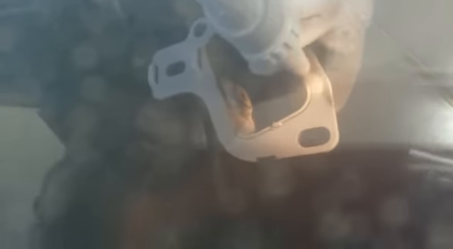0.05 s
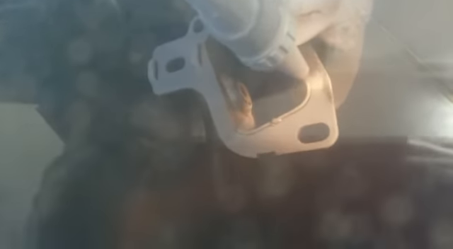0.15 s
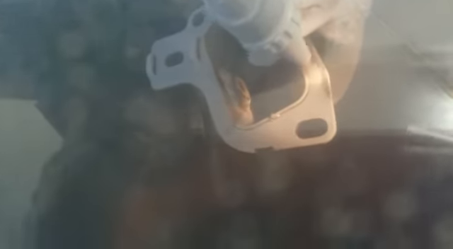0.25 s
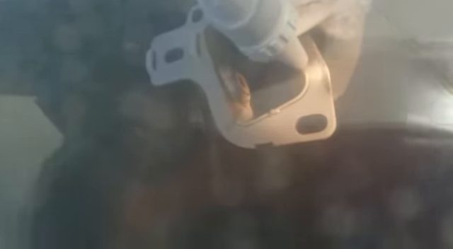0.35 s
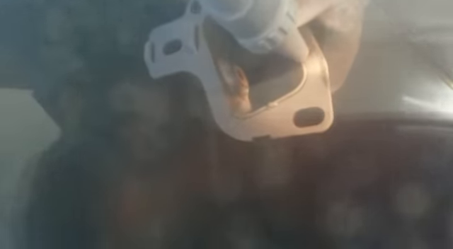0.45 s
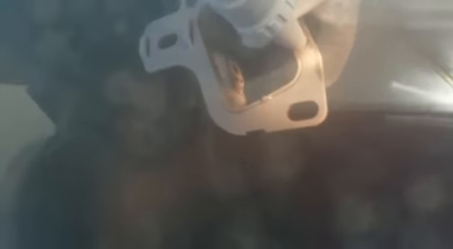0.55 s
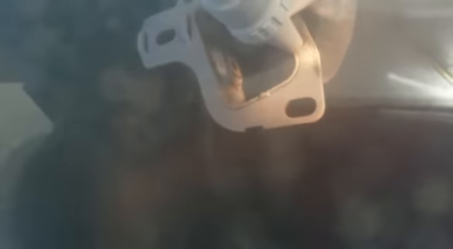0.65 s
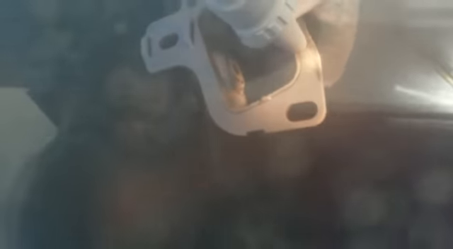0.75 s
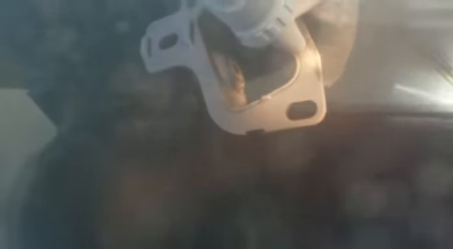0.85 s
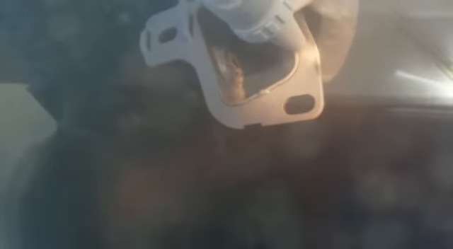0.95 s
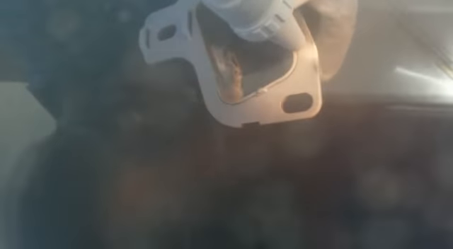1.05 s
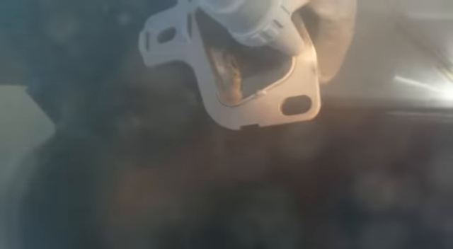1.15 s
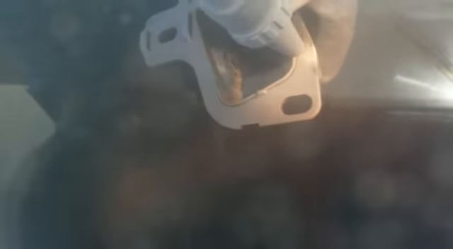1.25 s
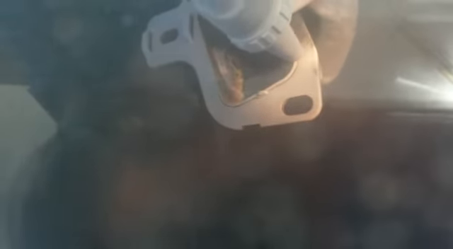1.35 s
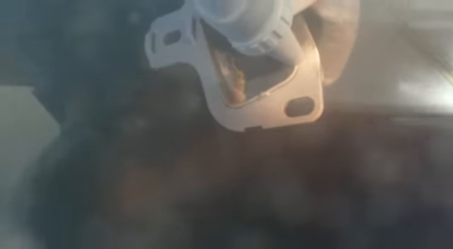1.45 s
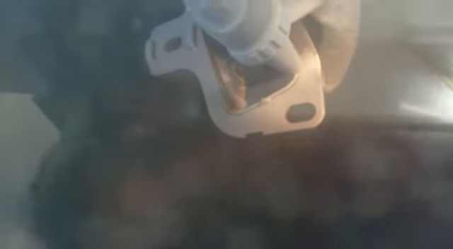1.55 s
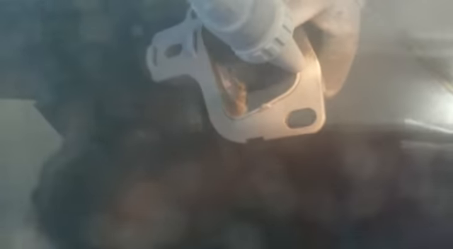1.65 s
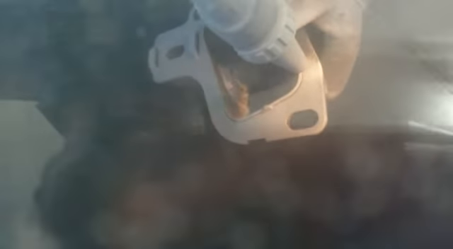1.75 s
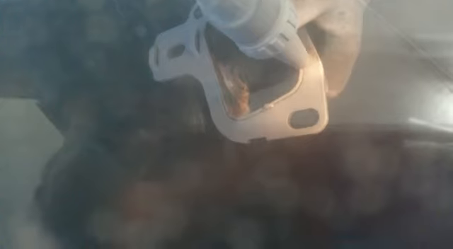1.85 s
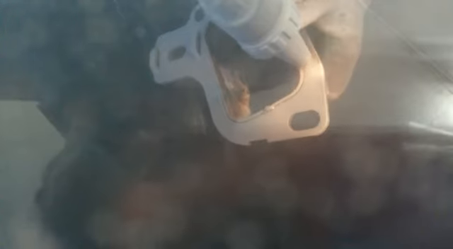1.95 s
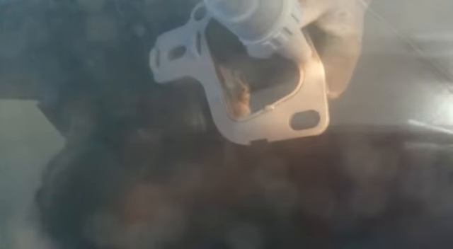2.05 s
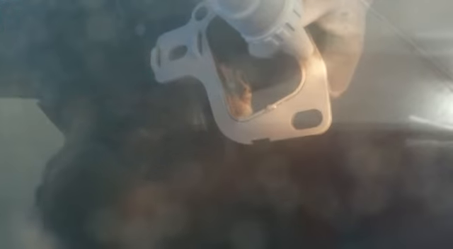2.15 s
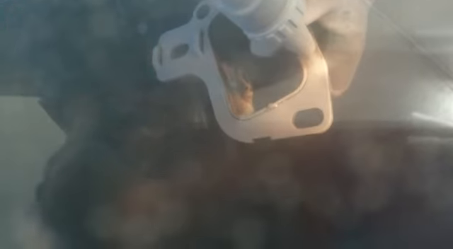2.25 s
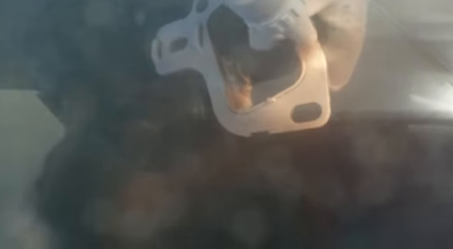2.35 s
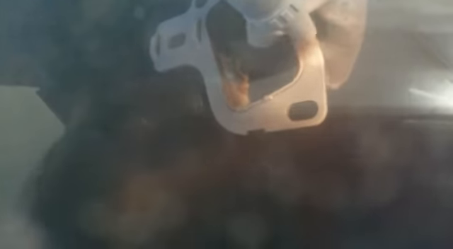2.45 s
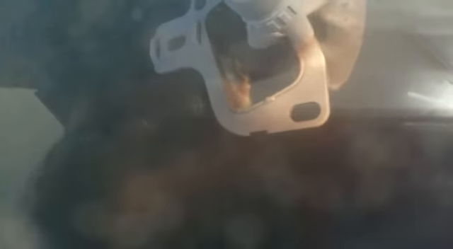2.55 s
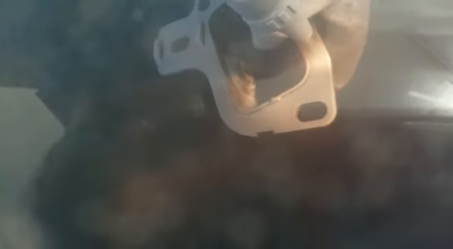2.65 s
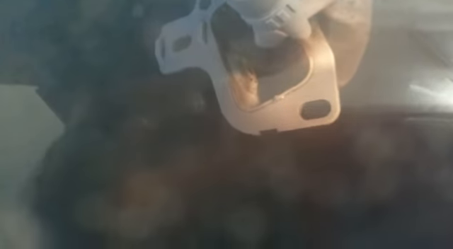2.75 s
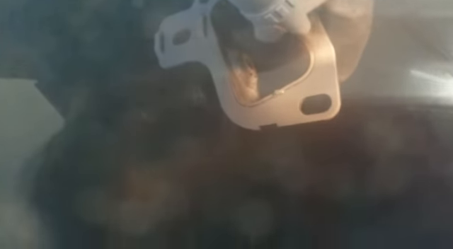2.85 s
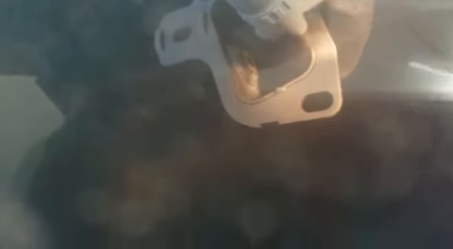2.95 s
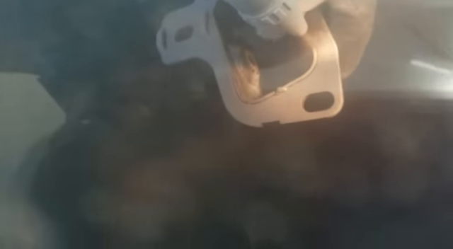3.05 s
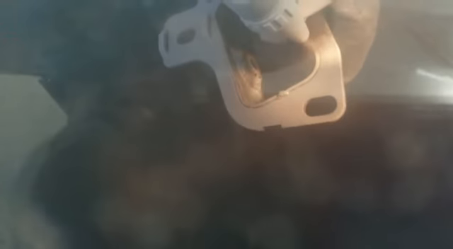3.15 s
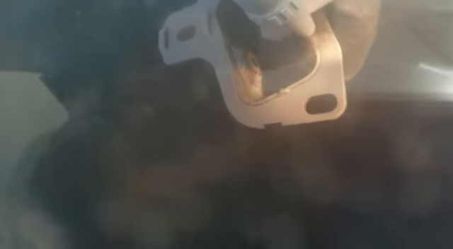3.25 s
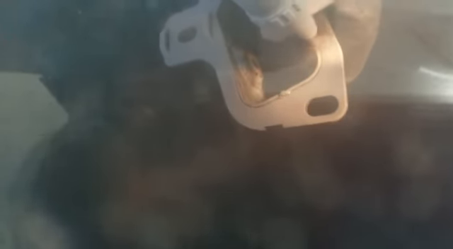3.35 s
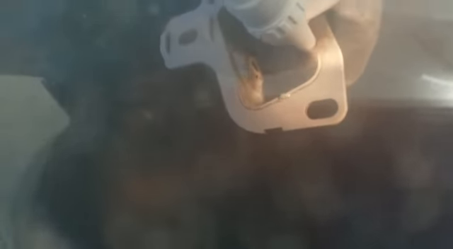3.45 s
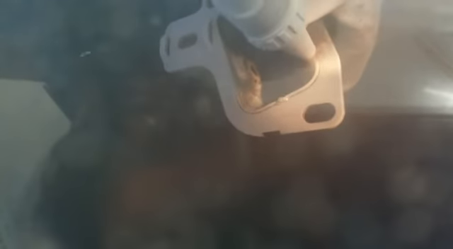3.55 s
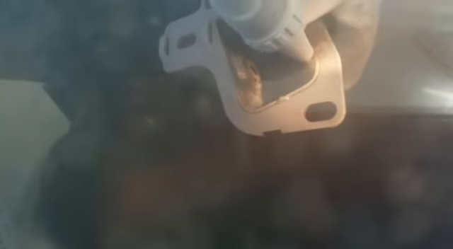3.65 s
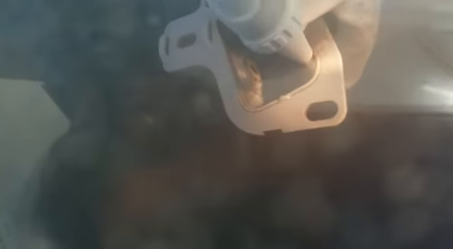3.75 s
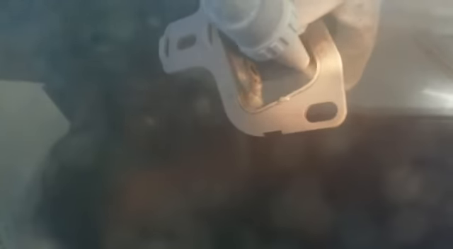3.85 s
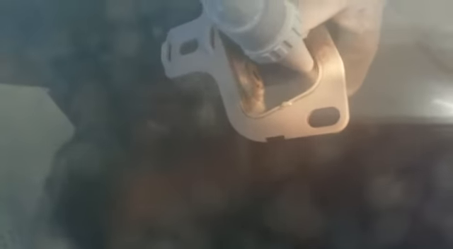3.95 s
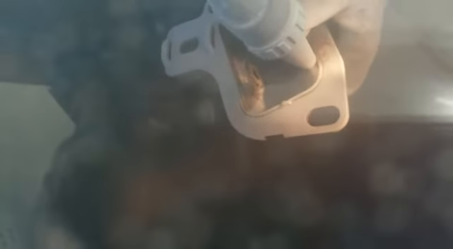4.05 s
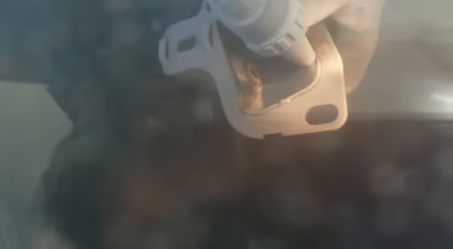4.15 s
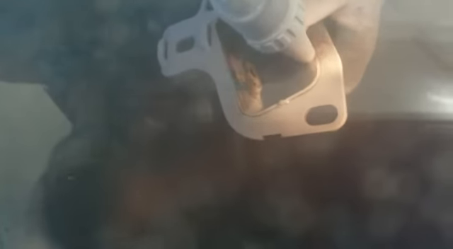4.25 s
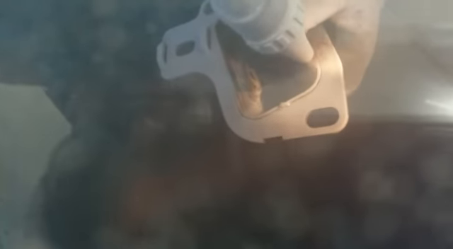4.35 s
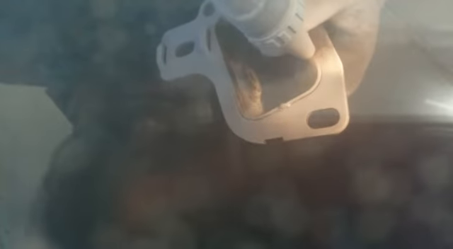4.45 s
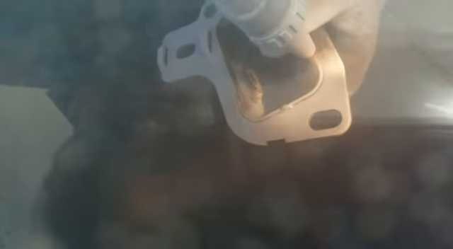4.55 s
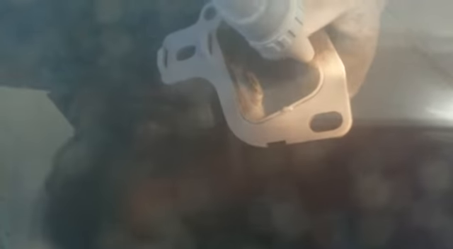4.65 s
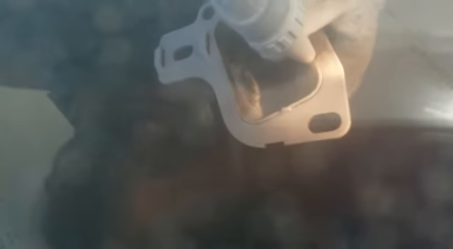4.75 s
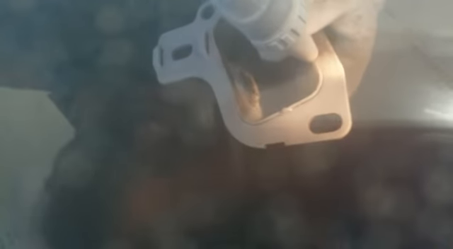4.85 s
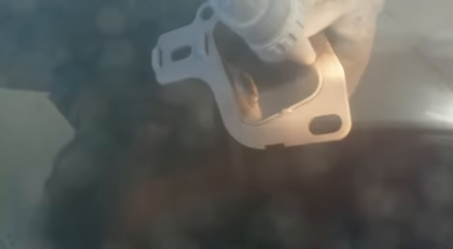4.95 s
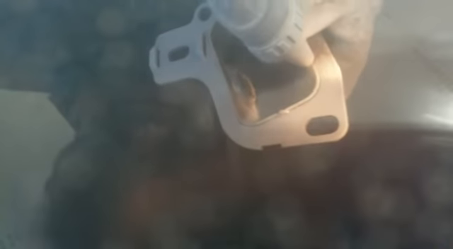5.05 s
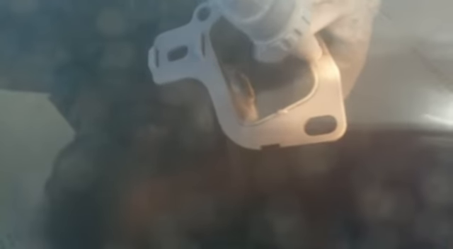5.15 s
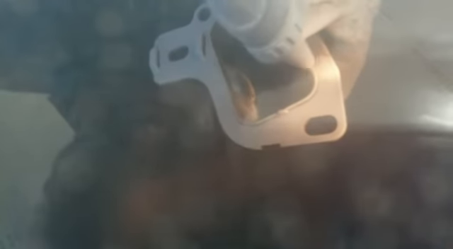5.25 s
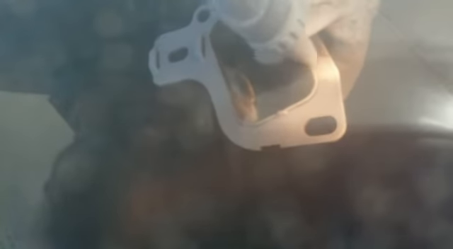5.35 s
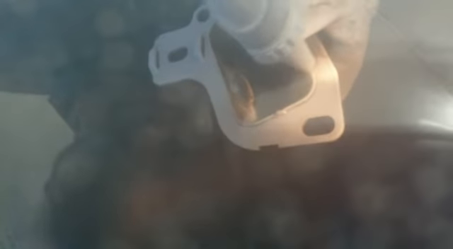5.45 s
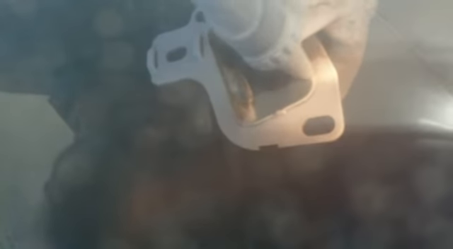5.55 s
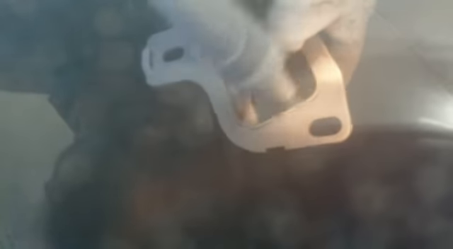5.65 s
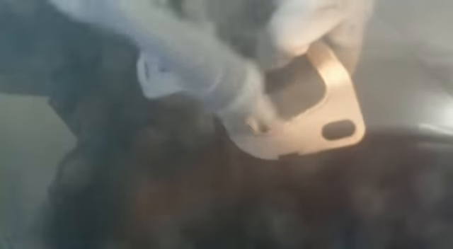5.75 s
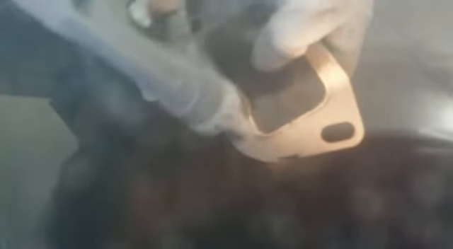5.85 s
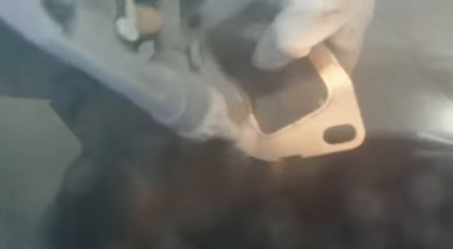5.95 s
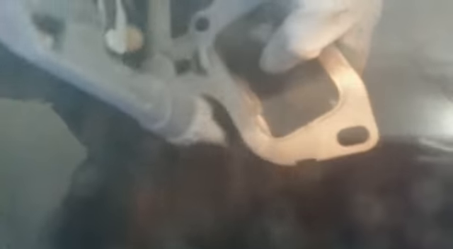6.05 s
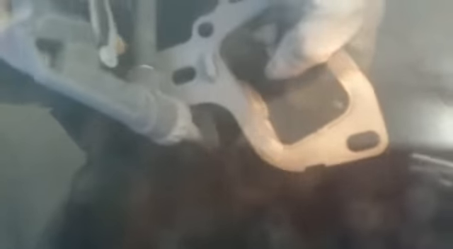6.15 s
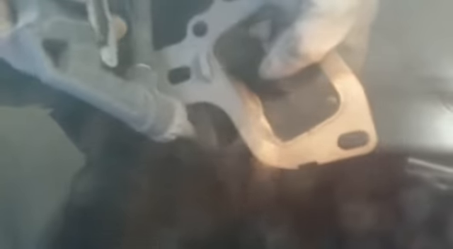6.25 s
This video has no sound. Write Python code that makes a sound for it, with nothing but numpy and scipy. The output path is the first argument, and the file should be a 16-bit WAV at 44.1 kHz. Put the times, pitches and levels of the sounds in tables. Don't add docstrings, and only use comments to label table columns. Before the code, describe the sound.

From 0 to 5.8 s a loud, harsh abrasive blast hisses continuously in a small sheet-metal cabinet: dense, treble-heavy turbulence with clumpy grit and metallic ringing around 4 to 5 kHz, plus a brighter sizzle near 11 kHz on the right. Its level wavers by a few decibels; around 1.3 to 1.9 s the high ring swells, and from 2.7 s a thin singing edge near 4.4 kHz appears, strongest at 3 s, then fades by 5.7 s. Low workshop hum and a compressor throbbing about 17 times a second lie mostly masked behind. At 5.8 s the jet stops abruptly with a very short box tail, and the background swells. Soft knocks come at 5.95 and 6.05 to 6.11 s, with a faint high valve whistle between. At 6.26 s grit hits again in a sharp, ringing metallic burst, ending at about 6.3 s. Close stereo phone pickup, compressed and grainy.

```python
import sys
import numpy as np
from scipy import signal
from scipy.fft import rfft, irfft
from scipy.io import wavfile
from scipy.ndimage import uniform_filter1d

SR = 44100
rng = np.random.default_rng(int(sys.argv[2]) if len(sys.argv) > 2 else 0)


def store_pcm(level_fs):
    pcm = np.round(np.clip(level_fs, -1, 1) * 32767).astype(np.int16)
    wavfile.write(sys.argv[1], SR, np.atleast_2d(pcm).T)


def undo_db(level):
    steps = np.asarray(level, float) / 20
    return 10 ** steps


N = 277830
T = np.arange(N) / SR
F = np.fft.rfftfreq(N, 1 / SR)

# frequency in Hz, level in dB.
SHOP_COLOUR = [(30, -20), (95, 5), (230, 11.5), (420, -3.5), (600, 5), (900, 1.5), (1500, 3), (2100, -8.5),
               (4500, -17), (7000, -21.5), (14000, -29)]
# frequency in Hz, likeness from 0 to 1.
PORT_LIKENESS = [(60, 0.68), (700, 0.43), (1200, 0), (3000, 0.03), (15000, 0.1)]
# frequency in Hz, width in Hz, level in dB.
TANK_MODES = [(103.6, 24, -10.5), (155, 35, -30), (221.3, 14.5, 3), (252.9, 12, 1.5), (359.4, 67, -13.5),
              (557.2, 37, -8), (680, 39, -13), (877, 6.6, -0.66), (1060, 48, -9)]
STROKE_HZ = 16.87
# start in seconds, frequency in Hz, level in dB,
# T60 in seconds, left minus right in dB.
KNOCKS = [(5.946, 2420, -31, .025, -6), (5.946, 2670, -36, 0.02, -12), (5.947, 2134, -41, .2, -9),
          (6.052, 580, -36, 0.05, -13), (6.112, 552, -34, 0.06, -9), (6.273, 2050, -31, .5, -4),
          (6.265, 3500, -29, .15, -3), (6.268, 4450, -25, .3, 5), (6.265, 5500, -27, .1, 5),
          (6.267, 8050, -33, .2, 0), (6.267, 11280, -31, .3, -14), (6.268, 10050, -35, .3, -14),
          (6.268, 6300, -33, .3, 0), (6.270, 4000, -31, .2, 3), (6.27, 1230, -42, .4, 0),
          (6.272, 2620, -41, .3, 0)]
# start in seconds, end in seconds, frequency in Hz, level in dB.
VALVE_WHISTLES = [(6.013, 6.076, 10670, -38), (6.045, 6.09, 10330, -41), (6.055, 6.113, 12000, -46)]
# time in seconds, level in dB.
EDGE_LEVEL = [
    (2.5, -54),
    (2.7, -34),
    (3.0, -31.5),
    (3.35, -34.5),
    (3.5, -35),
    (4.2, -38.5),
    (5.0, -40),
    (5.7, -54),
]

# frequency in Hz, level in dB.
JET_COLOUR = [(200, -34.5), (700, -15.5), (1300, -1.5), (2000, 1.5), (15000, 0)]
# frequency in Hz, width in Hz, left level in dB, right level in dB.
PART_MODES = [(2227, 55, 4.5, 1.5), (3304, 68, -15, 5), (3432, 35, -3, 7.5), (3648, 83, 0, 5.5),
              (4045, 29, 0.5, 2), (4280, 37, 5.5, -0.5), (4484, 45, 8, -0.5), (4780, 45, 4.5, 0.5),
              (5007, 47, 3, -2.5), (4930, 62, 2.5, -6.5), (5290, 90, 4.5, 1.5), (5485, 50, 2, 3),
              (5605, 69, 1.5, 1.2), (11220, 87, 6.5, 0), (11300, 100, 15, 4.5), (12270, 92, 1, 2)]
# frequency in Hz, carrier (0 walls, 1 part low, 2 part high, 3 nozzle).
HISS_CARRIER = [(3700, 0), (4250, 1), (4850, 1), (5150, 2), (5700, 2), (5880, 3)]
# time in seconds, jet level in dB, squareness of the grit strike in dB.
GUN_MOVES = [(0.0, -20.5, -10), (0.05, -20.5, -11), (0.79, -21.5, -8), (0.84, -19.5, -8),
             (2.01, -19.5, -10.5), (2.58, -21, -9), (2.72, -19, -10.5), (2.9, -22.5, -8.5),
             (3.29, -19, -7.5), (3.42, -20.5, -9), (3.69, -18.5, -9), (4.97, -21, -8), (5.05, -18.5, -9.5),
             (5.34, -20.5, -8.5), (5.69, -19.5, -10), (5.79, -20.5, -6)]
STRIKE_FOLLOW = (1.05, 0.92, .6)
# start, full, fading and end in seconds, swell in dB.
WEB_SWEEP = (.75, 1.3, 1.9, 2.35, 5)
STOP_S, RESTART_S, RESTART_ATTACK_S = 5.802, 6.2635, .003
RELEASE_DB_PER_S, LEAK_DB, LEAK_FADE_DB_PER_S = 434, -54, 298
RESTART_DB, RESTART_SAG_DB_PER_S = -28.5, 100
# walls, low ring, high ring, in dB over the jet.
FIRST_STRIKE = (5.5, 8, 5.5)

# frequency in Hz, gain in dB.
LEFT_RESPONSE = [(60, 8), (100, 2), (1000, 7.5), (2000, 5.5), (3000, 13), (4000, 17.5), (4500, 18),
                 (5600, 18.5), (6100, 15.5), (7000, 13.5), (10000, 3), (12000, 0), (13300, -1),
                 (14300, 10.5)]
RIGHT_RESPONSE = [(50, -2), (100, 5.5), (1500, 2.5), (2000, 14.5), (2700, 11.5), (3500, 17), (5000, 14.5),
                  (8000, 16), (10000, 19.5), (10800, 28), (11400, 31), (12000, 24.5), (13300, 19),
                  (14400, 15.5)]
DUCK_DB, SHOP_OPEN_DB, TANK_OPEN_DB, RECOVER_S = -3, 2.2, 1.2, 0.059
# start, top and end in seconds, swell in dB.
SHOP_SWELL = (2.9, 3.1, 3.501, 4.5)
# frequency in Hz, usual signal over step in dB.
BAND_FINENESS = [(50, -13), (110, -5), (230, 5), (330, -6), (440, -16), (580, -6), (790, -10), (900, -7),
                 (1300, -8), (1750, -8), (2200, -4), (2750, -9), (3200, -4), (5000, -6), (5400, -2),
                 (7200, -5), (11000, 3)]
# time in seconds, change in dB.
STEP_CHANGE = [
    (0, 0),
    (6.24, 0),
    (6.245, -25),
    (6.28, -25),
    (6.29, 13),
    (6.3, 13),
]
TOP_HZ, RESTART_TOP_HZ = 14520, 13100
HOP, LEAD, BAND = 1024, 800, 4


def level(x, db):
    return x * undo_db(db) / np.sqrt(np.mean(x ** 2))


def colour(points):
    hz, value = np.transpose(points)
    return np.interp(np.log(F + 1), np.log(hz), value)


def shape(x, gain):
    return irfft(rfft(x) * gain, N)


def resonance(hz, width):
    return 1j * F * width / (hz ** 2 - F ** 2 + 1j * F * width)


def walk(rate):
    k = int(SR / rate)
    held = np.repeat(rng.standard_normal(N // k + 1), k)
    return 0.79 * uniform_filter1d(uniform_filter1d(held, k), k)[:N]


def box(t60, direct):
    tail = rng.standard_normal((2, N)) * np.exp(-np.log(1000) * T / t60)
    tail /= np.sqrt(np.sum(tail ** 2, axis=1, keepdims=True))
    tail[:, 0] += direct
    return rfft(tail) / np.hypot(1, direct)


def workshop():
    like = np.clip(colour(PORT_LIKENESS), 0, 1)
    mid, side = rfft(rng.standard_normal((2, N)))
    pair = np.sqrt(1 + like) * mid + np.sqrt(1 - like) * side * np.array([[1], [-1]])
    air = irfft(pair * undo_db(colour(SHOP_COLOUR)), N)
    return level(air, -44.5) * undo_db(walk(4.6) / 2)


def compressor():
    chance = rng.standard_normal((int(T[-1] * STROKE_HZ) + 1, 2))
    when = (np.arange(len(chance)) + .3) / STROKE_HZ + .00008 * chance[:, 0]
    strokes = np.zeros(N)
    strokes[np.clip((when * SR).astype(int), 0, N - 1)] = undo_db(0.8 * chance[:, 1])
    soft = 1 / (1 + (F / 1300) ** 4)
    tank = 0
    for k, (hz, width, db) in enumerate(TANK_MODES):
        tank = tank + (-1) ** k * undo_db(db) * resonance(hz, width)
    thumps = shape(strokes, tank * soft * box(0.49, 2.6))
    return level(thumps, -47.5) * undo_db([[-1.5], [1.5]])


def small_sounds():
    out = np.zeros((2, N))
    for start, hz, db, t60, pan_db in KNOCKS:
        age = np.maximum(T - start, 0)
        ring = np.sin(2 * np.pi * hz * age) * np.exp(-np.log(1000) * age / t60)
        out += ring * undo_db([[db + pan_db / 2], [db - pan_db / 2]])
    for start, end, hz, db in VALVE_WHISTLES:
        swell = np.sin(np.pi * np.clip((T - start) / (end - start), 0, 1)) ** .5
        out += swell * np.sin(2 * np.pi * hz * T) * undo_db([[db - 23], [db]])
    return out


def singing_edge():
    ring = shape(rng.standard_normal(N), resonance(4452, 20) ** 2)
    edge_db = np.interp(T, *np.transpose(EDGE_LEVEL))
    return level(ring, 0) * undo_db(edge_db + np.array([[0], [-10]]))


def spray_controls():
    when, jet_db, strike_db = np.transpose(GUN_MOVES)
    since, age = np.maximum(T - STOP_S, 0), T - RESTART_S
    fall = np.interp(T, when, jet_db) - RELEASE_DB_PER_S * since
    leak = LEAK_DB - LEAK_FADE_DB_PER_S * np.maximum(since - .08, 0)
    shut = np.clip(1 - age / RESTART_ATTACK_S, 0, 2)
    again = RESTART_DB - RESTART_SAG_DB_PER_S * np.maximum(age, 0) - 40 * shut

    strike = np.interp(T, when, strike_db - np.median(strike_db))
    lingers_db = 6 * np.minimum(since / 0.051, 1)
    relative = []
    for share, hit_db in zip(STRIKE_FOLLOW, FIRST_STRIKE):
        relative.append(np.where(age > 0, hit_db, share * strike + lingers_db))
    sweep_db = WEB_SWEEP[4] * np.interp(T, WEB_SWEEP[:4], [0, 1, 1, 0])
    relative[0] = relative[0] + .22 * sweep_db
    relative[2] = relative[2] + sweep_db
    return np.maximum.reduce([fall, leak, again]), relative + [0]


def blast():
    nozzle_db, relative = spray_controls()
    grit = rng.standard_normal((2, N)) * undo_db(1.98 * rng.exponential(size=(2, N)))
    grit[1] += 0.4 * np.roll(grit[0], -6)
    rings = 1
    for hz, width, left_db, right_db in PART_MODES:
        rings = rings + np.outer(undo_db([left_db, right_db]) - 1, resonance(hz, width))
    hiss = rfft(level(grit, 0)) * undo_db(colour(JET_COLOUR)) * rings * box(.06, 4.5)
    surge = .35 * walk(9) + .5 * walk(35)
    out = 0
    for k, relative_db in enumerate(relative):
        region = colour([(hz, who == k) for hz, who in HISS_CARRIER])
        own = irfft(hiss * region, N)
        out = out + own * undo_db(relative_db + surge + 0.48 * walk(14))
    return out * undo_db(nozzle_db - 12.5)


def gain_control(open_db):
    opened = np.clip((T - STOP_S) / RECOVER_S, 0, 1)
    under_db = DUCK_DB + SHOP_SWELL[3] * np.interp(T, SHOP_SWELL[:3], [0, 1, 0])
    return undo_db(under_db + opened * (open_db - DUCK_DB))


def scene():
    ports = undo_db([colour(LEFT_RESPONSE), colour(RIGHT_RESPONSE)])
    behind = workshop() * gain_control(SHOP_OPEN_DB) + compressor() * gain_control(TANK_OPEN_DB)
    return shape(blast() + behind, ports) + singing_edge() + small_sounds()


def band_rounding(x, scatter_db=3.5, quiet_db=-51):
    n, k = np.arange(2 * HOP), np.arange(HOP)
    window = np.sqrt(2 / HOP) * np.sin(np.pi * (n + .5) / (2 * HOP))
    basis = window * np.cos(np.pi / HOP * np.outer(k + .5, n + .5 + HOP / 2))
    padded = np.pad(x, ((0, 0), (HOP + LEAD, 2 * HOP - (N + LEAD) % HOP)))
    blocks = padded.reshape(2, -1, HOP)
    bins = np.concatenate([blocks[:, :-1], blocks[:, 1:]], axis=2) @ basis.T
    hz = (k + .5) * SR / (2 * HOP)
    s = (np.arange(bins.shape[1]) * HOP - LEAD) / SR

    power = np.mean(bins ** 2, axis=1, keepdims=True)
    usual = np.sqrt(uniform_filter1d(power, size=9, axis=2))
    loud = np.sqrt(np.mean(bins ** 2, axis=(0, 2), keepdims=True) / np.mean(bins ** 2))
    chance = np.repeat(rng.standard_normal((2, len(s), HOP // BAND)), BAND, axis=2)
    chance = uniform_filter1d(chance, size=3, axis=1) * np.sqrt(3)
    follow = np.interp(hz, [1500, 6000], [.8, 1.5])
    step_db = scatter_db * chance - np.interp(hz, *np.transpose(BAND_FINENESS))
    step_db = step_db + np.interp(s, *np.transpose(STEP_CHANGE))[:, None]
    floor = undo_db(quiet_db) * np.minimum(hz / 10000, 1) ** 4
    step = np.maximum(usual * loud ** follow * undo_db(step_db), floor)

    top_hz = np.where(s > RESTART_S, RESTART_TOP_HZ, TOP_HZ)[:, None]
    kept = np.sign(bins) * np.floor(np.abs(bins) / step + .4054) * step * (hz < top_hz)
    frames = kept @ basis
    return (frames[:, 1:, :HOP] + frames[:, :-1, HOP:]).reshape(2, -1)[:, LEAD:LEAD + N]


def band_limit(x):
    return signal.sosfilt(signal.butter(12, 15810, fs=SR, output="sos"), x)


def record(dry):
    limited = np.tanh(1.222 * dry) / 1.214
    mix = band_rounding(limited)
    return band_limit(mix)


dry = scene()
out = record(dry)
store_pcm(out)
```